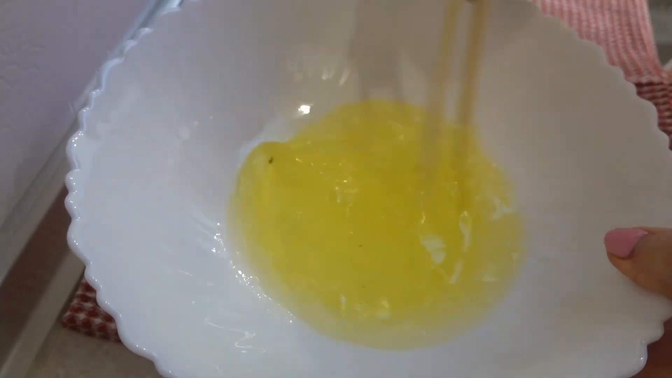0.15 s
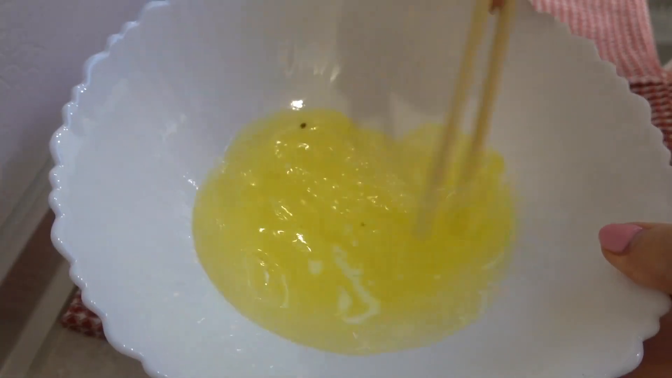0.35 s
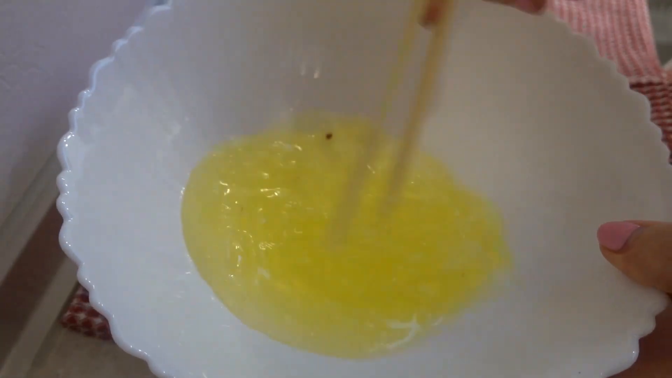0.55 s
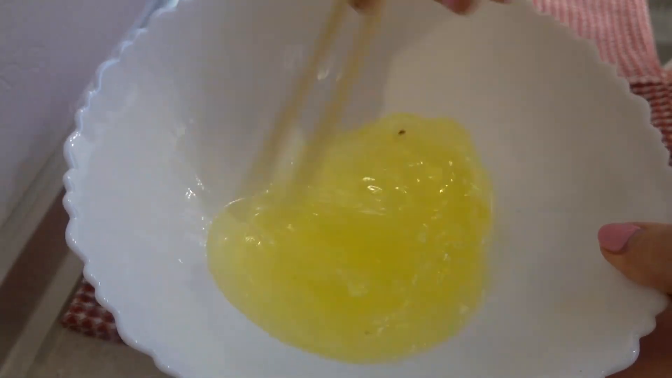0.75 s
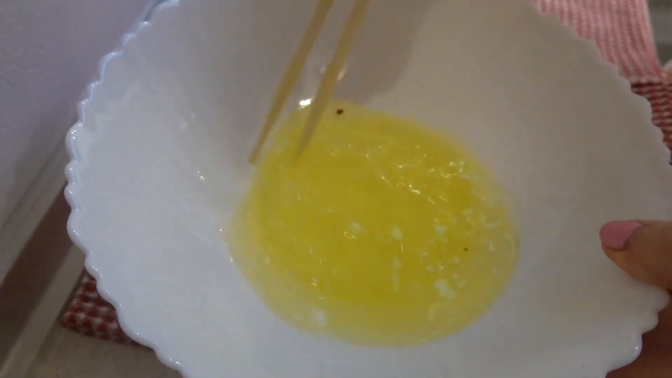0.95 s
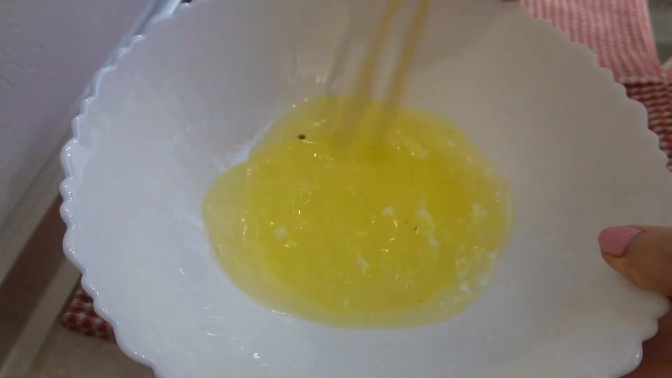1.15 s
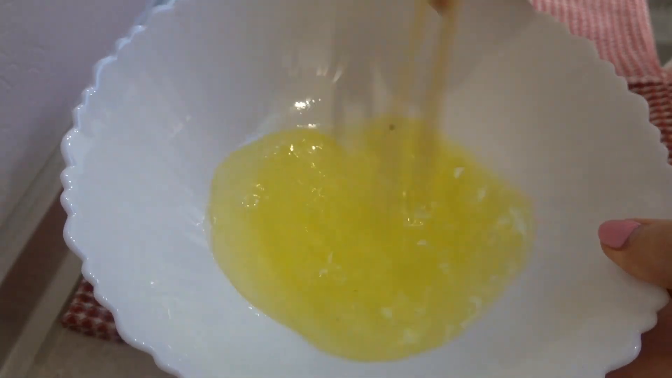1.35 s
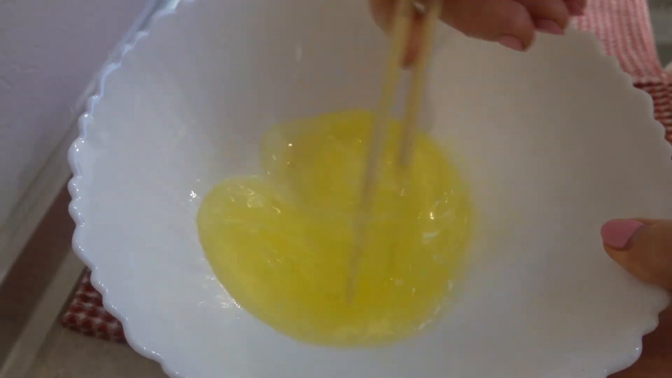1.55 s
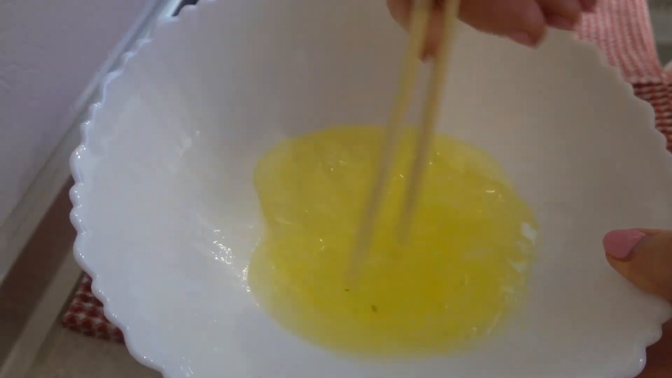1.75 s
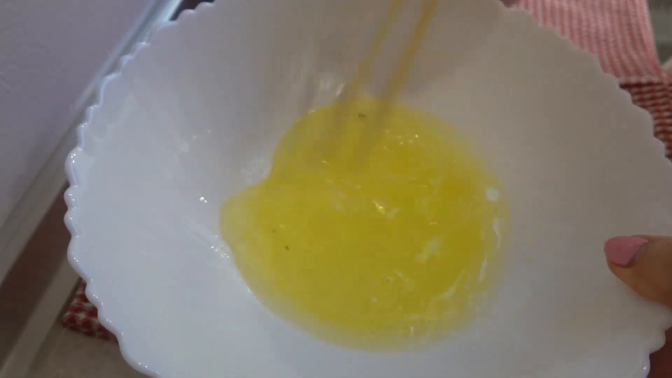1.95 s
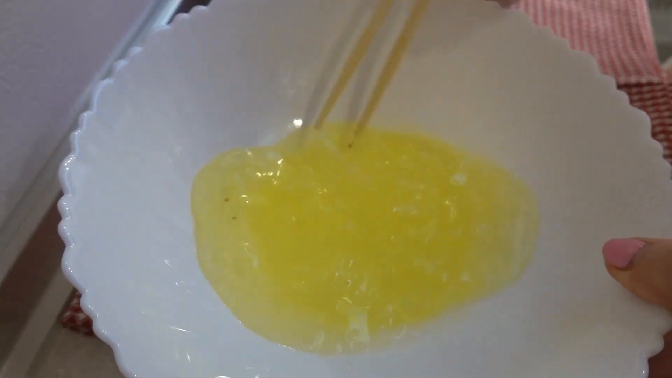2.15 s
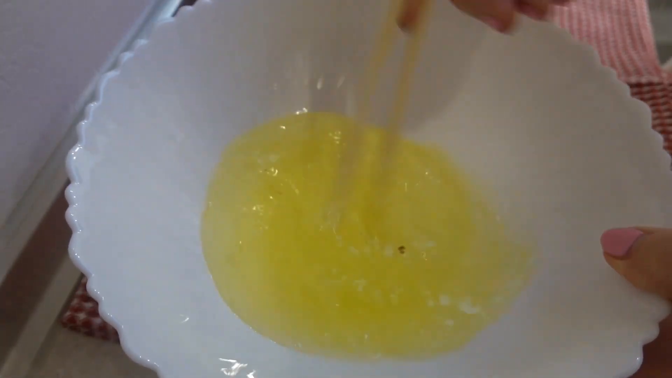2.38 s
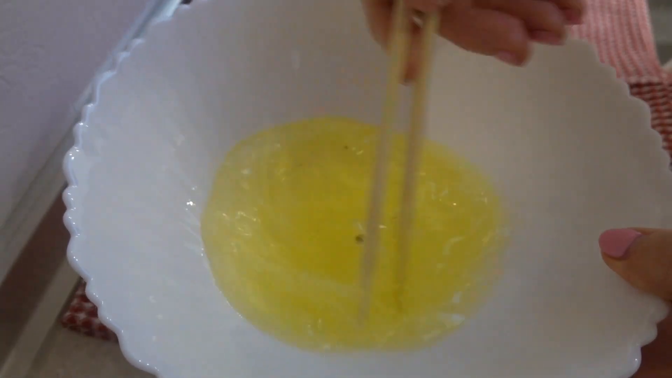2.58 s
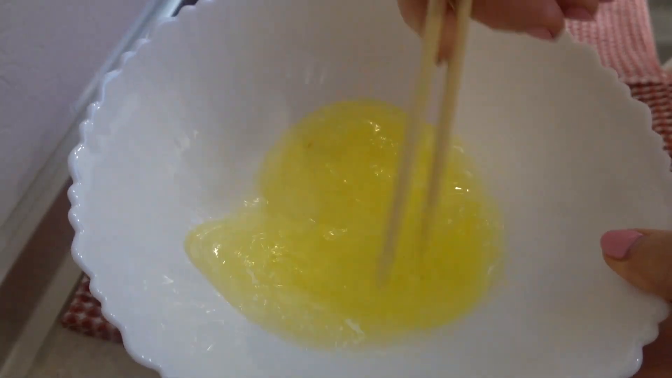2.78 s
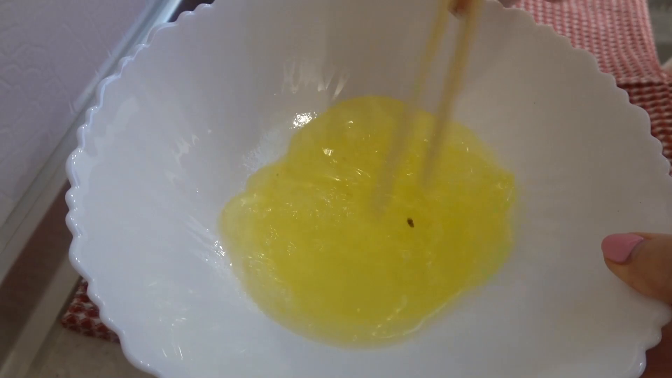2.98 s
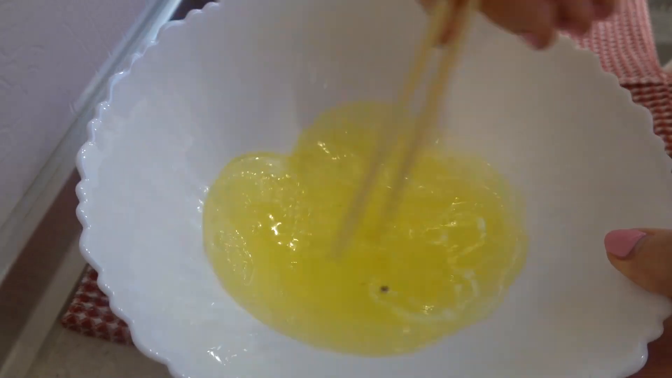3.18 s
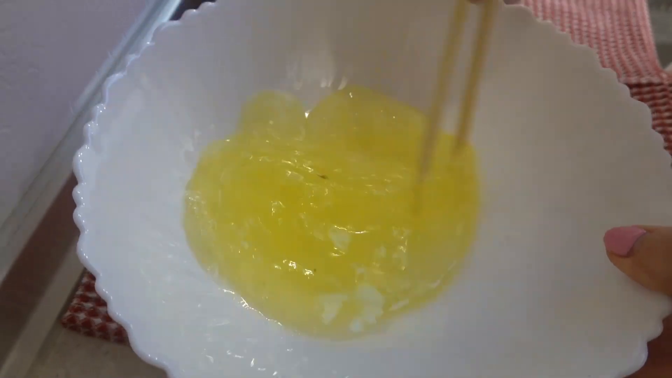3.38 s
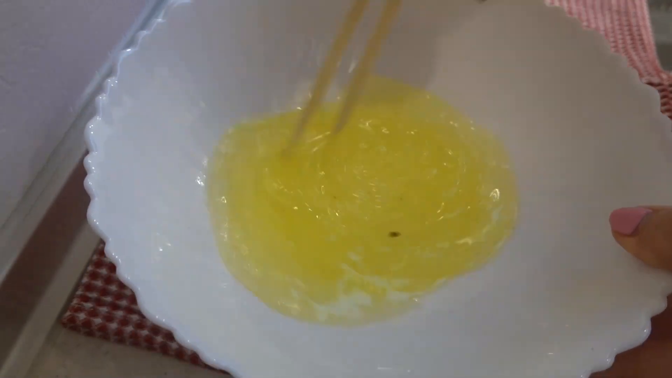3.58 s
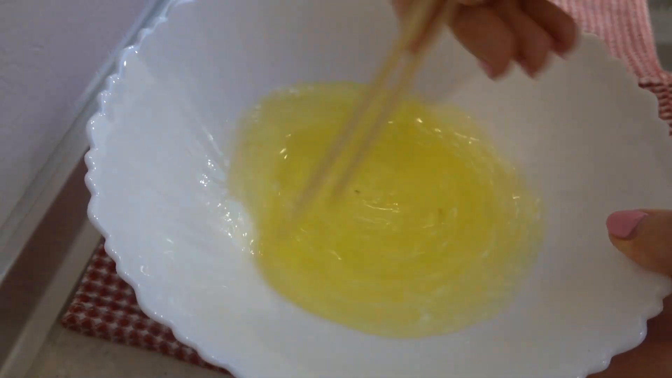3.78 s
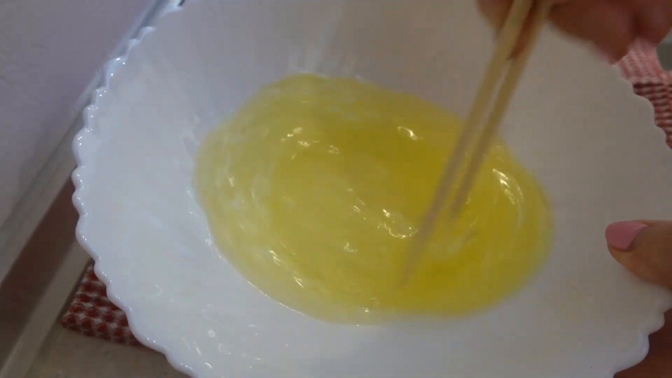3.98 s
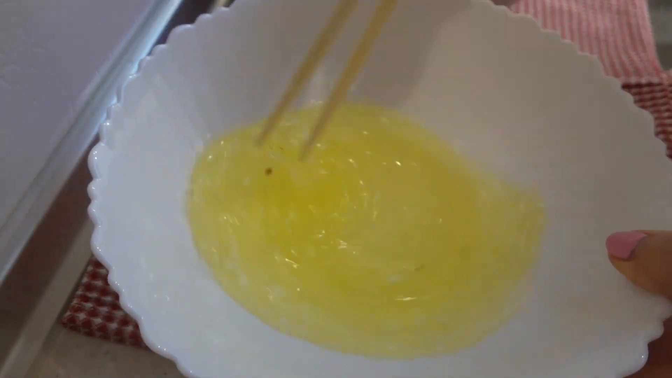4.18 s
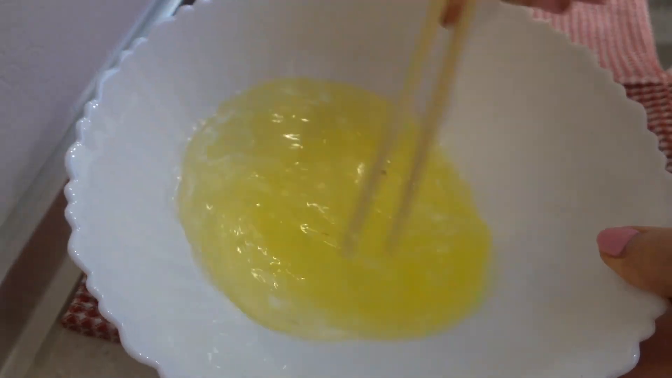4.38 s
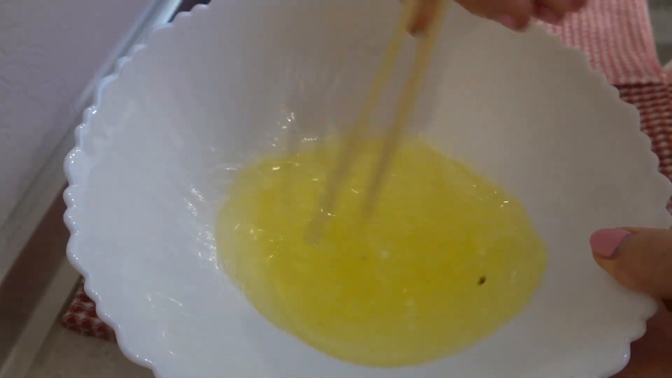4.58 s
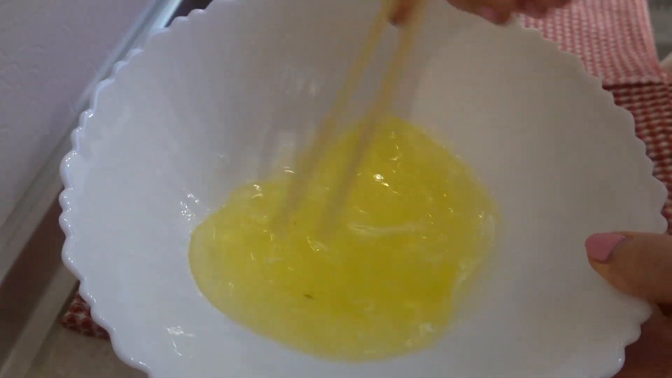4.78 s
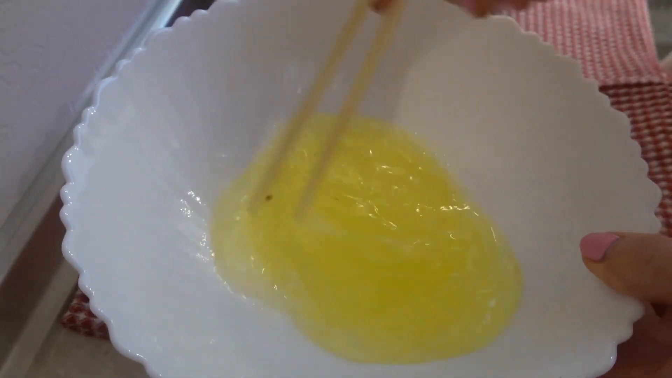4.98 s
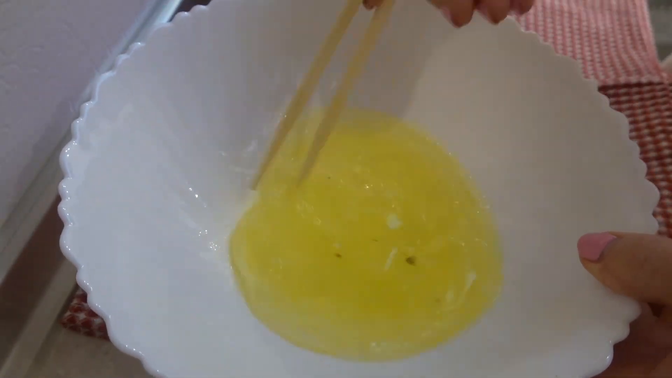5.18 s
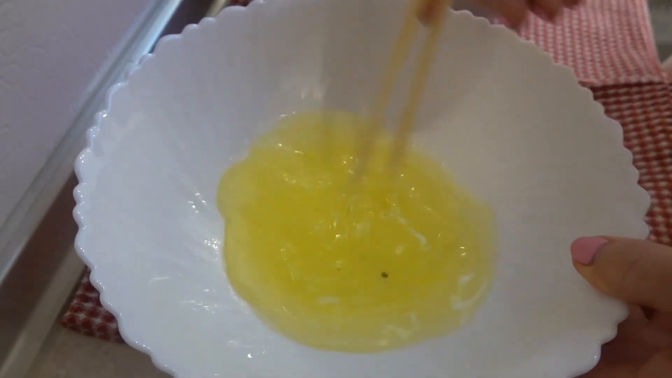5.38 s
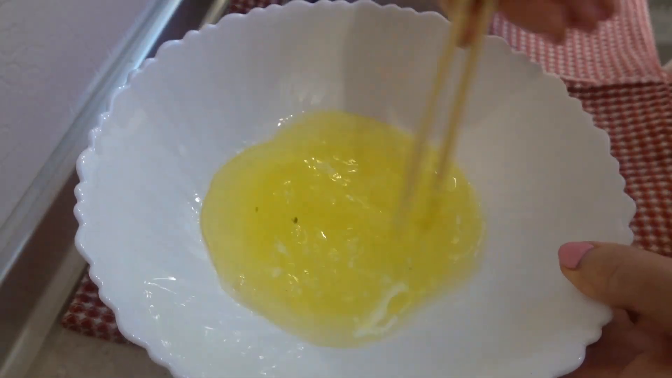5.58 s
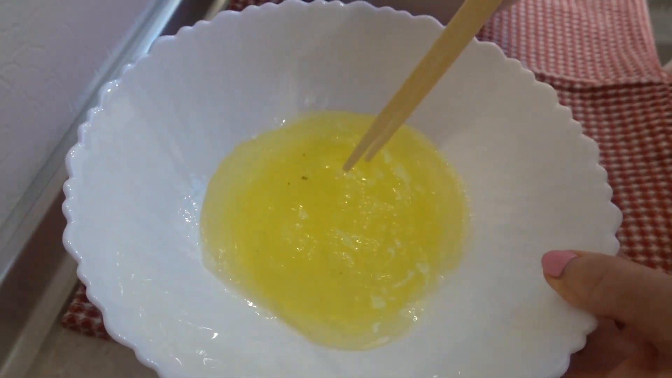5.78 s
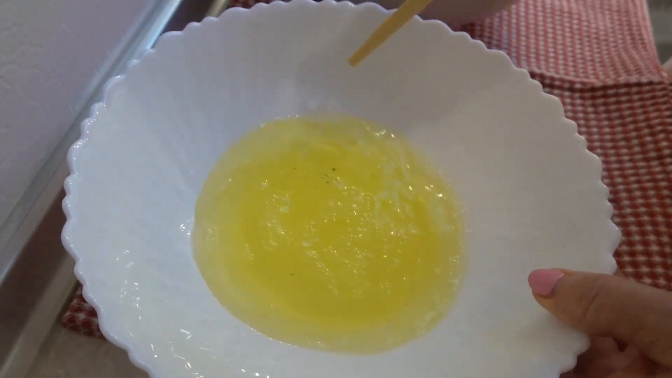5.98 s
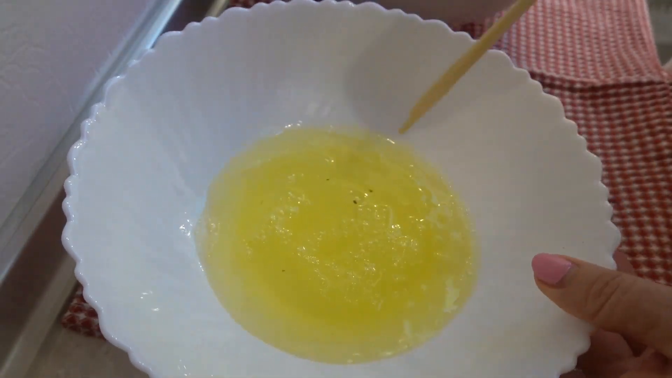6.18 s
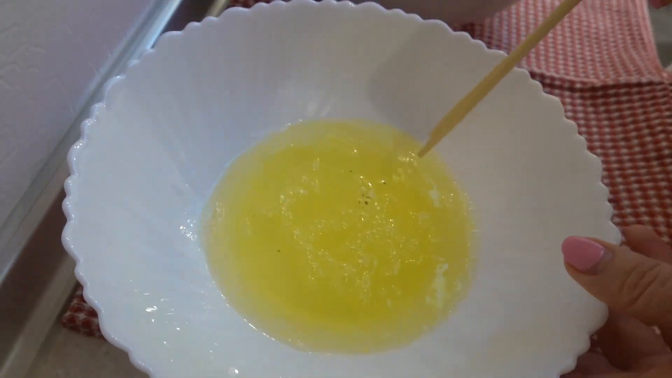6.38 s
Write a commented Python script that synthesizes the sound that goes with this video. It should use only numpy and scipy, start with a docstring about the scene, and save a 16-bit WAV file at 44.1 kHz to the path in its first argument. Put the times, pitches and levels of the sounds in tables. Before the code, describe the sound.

Close, splashy egg beating with hollow plops and fine spatter runs fast, pauses, resumes, and ends with a small ceramic clink in a kitchen.

```python
"""Chopsticks beat raw egg in a ceramic bowl close to a phone in a small kitchen: a fast run, a lull, a second run.
Each slap of the egg is a burst of wet noise and fine spray with a ringing air pocket; low plops are bending tones.
Noise bursts are thrown egg that spatters, flickering noise is egg that slides, and tiny tones are froth.
The air hollow and the ceramic colour the slaps, short low tones thump, and a short noise tail is the room.
At the end a stick taps the rim and the ceramic rings, over room rumble, hiss and a faint hum."""
import sys
import numpy as np
from scipy import signal
from scipy.fft import rfft, irfft
from scipy.io import wavfile
from scipy.ndimage import uniform_filter1d

SR = 44100
rng = np.random.default_rng(int(sys.argv[2]) if len(sys.argv) > 2 else 0)


def field_ratio(decibels):
    """Amplitude ratio for a level in dB (20 dB per decade); scalars and array-likes work."""
    return 10 ** (np.asarray(decibels, dtype=float) / 20)


def output_pcm(signal):
    """Save a mono or channel-first signal as 16-bit PCM at the path in sys.argv[1].

    Samples are clipped to [-1, 1] before scaling.
    """
    pcm = np.clip(np.atleast_2d(signal).T, -1, 1) * 32767
    wavfile.write(sys.argv[1], SR, np.round(pcm).astype(np.int16))


N = 284445  # length in samples

# Table levels are in dB; slaps, ceramic, hollow and background add a level of their own.
# slaps of the egg, stick strikes and the splashes that follow them:
# (t/s, level/dB, pocket f/Hz, spray level/dB)
EGG_SLAPS = [(0.0138, -27.5, 2660, -37), (0.131, -13, 2460, -19), (0.1719, -11.5, 2810, -24.5),
             (0.1853, -16, 2900, -18.5), (0.1911, -9.5, 2370, -47), (0.2034, -15, 2440, -21.5),
             (0.2945, -12.5, 4980, -17), (0.3659, -13.5, 5020, -28.5), (0.4697, -13, 2516, -15.5),
             (0.5493, -10.5, 1490, -30), (0.5809, -15.5, 2330, -31.5), (0.6193, -22.5, 3030, -21),
             (0.648, -10.5, 2940, -18), (0.6857, -20, 2990, -35), (0.7774, -20.5, 3510, -42),
             (0.7891, -13.5, 7130, -26.5), (0.8154, -11.5, 2390, -21.5), (0.9046, -18.5, 2370, -48.5),
             (0.9801, -11, 2663, -17), (1.046, -14.5, 1330, -24), (1.1574, -14.5, 2000, -15.5),
             (1.2178, -16.5, 1310, -25), (1.3314, -25, 2600, -19.5), (1.3528, -16, 3690, -31.5),
             (1.4045, -21.5, 1620, -35), (1.4982, -13, 2760, -21.5), (1.514, -13, 2330, -31.5),
             (1.5604, -21, 1630, -46), (1.6136, -17, 1900, -39), (1.6477, -12.5, 1836, -18.5),
             (1.69, -15.5, 2740, -17), (1.736, -8, 2796, -20), (1.8481, -13, 4210, -19),
             (1.8881, -6.5, 1417, -48.5), (2.0157, -19, 2960, -28.5), (2.027, -14.5, 4570, -18),
             (2.0503, -17.5, 2570, -33.5), (2.0974, -23, 1510, -21), (2.197, -11.5, 1617, -16.5),
             (2.369, -14, 2550, -20), (2.3987, -22.5, 1370, -23), (2.4535, -14, 2780, -29.5),
             (2.5454, -9.5, 1650, -20), (2.61, -13, 2645, -33), (2.7199, -9, 2240, -19.5),
             (2.774, -8.5, 2890, -23.5), (2.8923, -11, 1390, -21.5), (2.953, -9.5, 2030, -23),
             (2.9797, -11, 1360, -23), (3.064, -10.5, 2355, -21), (3.133, -25, 4460, -23),
             (3.2706, -11.5, 1774, -30), (3.3272, -23, 2650, -36), (3.4785, -28.5, 2760, -48),
             (3.496, -23, 2520, -59), (3.641, -26, 1440, -49), (4.1449, -29, 2880, -53.5),
             (4.1468, -22, 1450, -60), (4.3064, -13, 1450, -20.5), (4.344, -18, 2430, -41),
             (4.4519, -20, 2940, -53), (4.478, -12, 3550, -20.5), (4.588, -24, 1380, -46.5),
             (4.6684, -12.5, 2760, -19.5), (4.7572, -15, 2670, -37), (4.8122, -24.5, 1490, -37),
             (4.856, -13.5, 2620, -18.5), (4.9139, -8, 3530, -19), (5.0078, -10, 3080, -22.5),
             (5.0445, -9, 2760, -15.5), (5.0755, -12, 2680, -40), (5.0996, -13.5, 3480, -21.5),
             (5.1134, -20, 2760, -21), (5.2165, -10, 2410, -20), (5.249, -19, 2690, -29.5),
             (5.2963, -13, 1680, -22.5), (5.406, -12.5, 4720, -20), (5.4388, -12.5, 3500, -20.5),
             (5.5746, -10.5, 2410, -17)]
# low plops, air pockets and, near 960 Hz, the bowl's air hollow sounding:
# (t/s, level/dB, starting f/Hz, f/Hz that the bend passes as the plop dies)
LOW_PLOPS = [(0.01, -25.5, 930, 984), (0.419, -40, 1063, 1090), (.554, -22.5, 857, 940),
             (0.6207, -19.5, 967, 990), (1.043, -15, 586, 898), (1.176, -15.5, 954, 904),
             (1.218, -14, 817, 798), (1.235, -21.5, 1120, 1170), (1.4265, -21, 948, 969),
             (1.6508, -14, 947, 927), (1.7, -17, 990, 1094), (1.835, -25.5, 940, 847),
             (1.889, -20.5, 966, 990), (1.9384, -13, 980, 970), (2.395, -18, 955, 964),
             (2.437, -26.5, 966, 878), (2.61, -17, 835, 841), (2.7722, -15, 932, 985),
             (2.893, -12.5, 969, 988), (2.9797, -17, 947, 1012), (4.36, -32.5, 962, 983),
             (4.915, -26.5, 990, 962), (5.0137, -23, 947, 980), (5.067, -21.5, 1018, 973),
             (5.0996, -21.5, 847, 846), (5.298, -13.5, 1066, 1176)]
# egg sliding round the wall: (t/s, level/dB)
SLIDE_LEVEL = [(0, -52), (1.8, -50.5), (2.15, -57.5), (3.2, -60.5), (3.8, -53.5), (4.1, -56.5),
               (4.25, -65.5), (5.2, -59), (5.921, -57.5), (6.1, -71.5), (6.45, -66.5)]
# resonances of the air hollow of the bowl: (f/Hz, t60/s, level/dB)
HOLLOW_MODES = [(943, 0.03, 15), (1650, 0.073, 1.5), (2444, 0.069, -0.5),]
# ringing modes of the ceramic: (f/Hz, level/dB, t60/s when free of liquid)
CERAMIC_MODES = [(807, -3, 2.5), (1389, -10, 1.0), (2073, 0, 1.0), (2869, -8, .51), (3768, -9, .38),
                 (4770, -13, .2)]
# low thumps and rumbles of the bowl, short low tones: (t/s, level/dB, f/Hz, t60/s)
LOW_THUMPS = [(1.043, -21, 372, 0.045), (3.63, -41, 72.5, 0.42), (5.596, -29, 97.5, 0.19),
              (6.305, -25.5, 97, 0.11)]
# spectrum of the kitchen rumble and hiss: (f/Hz, level/dB)
BACKGROUND_SPECTRUM = [(15, -45), (25, -9.5), (53, -3.5), (175, -10), (242, -11.5), (503, -21),
                       (16000, -44)]
# spatters of thrown egg landing on the wall: (t/s, level/dB)
SPATTERS = [(0.258, -24.5), (0.3127, -21.5), (.416, -30.5), (0.5346, -30), (.5564, -30), (0.8752, -33),
            (1.1143, -36.5), (1.2905, -38), (1.5793, -29), (1.7462, -21.5), (1.9565, -33.5),
            (2.3214, -30.5), (2.4048, -25.5), (2.6263, -27), (2.668, -38), (2.799, -26), (2.9395, -26.5),
            (3.712, -46), (4.429, -30.5), (4.7142, -22.5), (4.761, -24.5), (5.279, -28), (5.3507, -28)]

POCKET_GLIDE = .08  # upward bend of small air pockets


def fade(t, t60):
    """Exponential decay, 60 dB down after t60 seconds."""
    return np.exp(-np.log(1000) * t / t60)


def band(x, lo_hz, hi_hz, order=2):
    """Band-pass along time."""
    sos = signal.butter(order, [lo_hz, min(hi_hz, .45 * SR)], "band", fs=SR, output="sos")
    return signal.sosfilt(sos, x)


def unit(x):
    """Scale to rms 1."""
    return x / np.sqrt(np.mean(x ** 2))


def ring(x, hz, t60):
    """One resonance set ringing by x: a decaying sine follows every sample."""
    pole = np.exp(2j * np.pi * hz / SR - np.log(1000) / (t60 * SR))
    return signal.lfilter([1], [1, -pole], x).imag


def add(out, s, sound):
    """Mix a short sound in at time s."""
    i = max(int(s * SR), 0)
    out[..., i:i + sound.shape[-1]] += sound[..., :N - i]


def pair(mid, side):
    """Left and right from mid and side."""
    return np.array([mid + side, mid - side])


def walk(rate):
    """Random levels, a new one every 1 / rate seconds, joined by ramps."""
    k = int(SR / rate)
    return uniform_filter1d(np.repeat(rng.standard_normal(N // k + 1), k), k)[:N]


def smooth_noise(length, size):
    """Noise averaged over size samples, rescaled to a spread near 1."""
    return uniform_filter1d(rng.standard_normal(length), size=size) * np.sqrt(size)


def bubble(t, hz, t60, glide, rise_s):
    """A decaying tone, like a ringing air pocket; glide bends it upward, as when a pocket nears the surface."""
    t60 = max(t60, .01)
    tone = np.sin(2 * np.pi * hz * (t + glide * t ** 3 / t60 ** 2))
    return tone * (1 - np.exp(-t / rise_s)) * fade(t, t60)


def quiet():
    """Shaped noise as rumble shared by both ports and hiss apart, with a wavering appliance hum."""
    level_db, hum_hz, hum_db = -55.5, 142.6, -61.5
    f = np.maximum(np.fft.rfftfreq(N, 1 / SR), 1)
    hz, db = np.transpose(BACKGROUND_SPECTRUM)
    gain = field_ratio(np.interp(np.log(f), np.log(hz), db))
    mid, side = irfft(rfft(rng.standard_normal((2, N))) * gain, N)
    side = .13 * side + 1.4 * band(side, 1500, 19000, order=1)
    # a narrow band of noise wavers like an unsteady tone
    hum = unit(band(rng.standard_normal(N), hum_hz - 5, hum_hz + 5, order=1)) * field_ratio(hum_db)
    return pair(mid, side) / np.std(mid) * field_ratio(level_db) + hum


def swish():
    """Thick liquid sliding on glaze: noise that flickers band by band."""
    spatter_db, busy_gurgle_db, calm_gurgle_db = 5, 8, 3
    slap_marks = np.zeros(N)
    slap_marks[(np.array(EGG_SLAPS)[:, 0] * SR).astype(int)] = 1
    # the egg gurgles where slaps come thick and settles where they are sparse
    beating = np.clip(uniform_filter1d(slap_marks, size=SR // 4) * SR / 10 - .5, 0, 1)
    gurgle_db = calm_gurgle_db + (busy_gurgle_db - calm_gurgle_db) * beating
    flicker_db = spatter_db * beating * walk(90)  # shared by all bands
    slide = 0
    for hz in 700 * 2 ** np.arange(0, 4.4, .25):
        # strongest near 1.8 kHz; every narrow band gurgles on its own, the treble less
        tilt_db = -9 - 1.5 * abs(np.log2(hz / 1800))
        share_db = tilt_db + gurgle_db * min(3500 / hz, 1) * walk(45) + flicker_db
        noise = band(rng.standard_normal((2, N)), hz / 1.034, hz * 1.046, order=1)
        slide += field_ratio(share_db) * unit(noise)
    s, db = np.transpose(SLIDE_LEVEL)
    return field_ratio(np.interp(np.arange(N) / SR, s, db)) * pair(slide[0], 0.62 * slide[1])


def droplets(out, s, db, wobble):
    """Trailing drops: small trembling air pockets of chance time, pitch and level, later ones weaker."""
    t = np.arange(1300) / SR
    for late, pitch, weak in rng.random((14, 3)):
        blob = bubble(t, 900 * 5.5 ** pitch, 0.026, POCKET_GLIDE, 0.0059) * wobble[-1300:]
        add(out, s + .09 * late, field_ratio(db - 4 - 10 * weak - 11 * late) * blob)


def bowl_colour(x):
    """The air hollow rings with the splashes; the egg also shakes the ceramic, damped by the liquid."""
    x = x + sum(field_ratio(db - 43.0) * ring(x, hz, t60) for hz, t60, db in HOLLOW_MODES)
    return x + sum(field_ratio(db - 47.0) * ring(x, hz, .045) for hz, db, _ in CERAMIC_MODES)


def slaps():
    """A crack, a wet body of noise, a fine spray, a ragged small pocket and trailing droplets for each slap."""
    body_db, pocket_db, spray_trim_db = -10.5, -5, 1.5
    rest_gap_s, lead_s = .11, 1 / 80
    body, spray, pockets = np.zeros((2, N)), np.zeros((2, N)), np.zeros(N)
    t = np.arange(SR // 8) / SR
    gaps = np.diff(np.array(EGG_SLAPS)[:, 0], append=N / SR)
    for (s, db, hz, spray_db), gap in zip(EGG_SLAPS, gaps):
        wet, fine = rng.standard_normal((2, 2, len(t)))
        # the liquid lands in clumps, and a pocket's walls tremble
        clump, wobble = smooth_noise(len(t), 64), smooth_noise(len(t), 64)
        surge = smooth_noise(len(t), 400)
        if gap < rest_gap_s:
            # 1 is a full slap; only the softest slaps fall below it
            hard = np.clip(2 + (max(db, spray_db + 8.5) + 6) / 22, .05, 1)
            dry_db = 0
            t60 = np.clip(0.5 * gap, 0.047, .1)  # splashes are shorter when the next slap is near
        else:
            # before a longer gap the slap is a dry pat with weaker drops
            hard, dry_db, t60 = 1, -8, 0.05
        crack = 1.63 * hard * fade(t, 0.0051)
        splash = (1 - np.exp(-t * hard / 0.0019)) * fade(t, t60) * field_ratio(3.72 * clump)
        run_off = 0.042 * field_ratio(dry_db) * fade(t, 0.085) * field_ratio(10.6 * surge)
        shape = crack + splash + run_off

        # each splash is coloured around the pitch of its pocket, soft ones more narrowly
        top_hz = max(3500 * field_ratio(3 * max(spray_db - db + 13.0, 0)), hz)  # strong spray opens the top
        low_hz = hz / 1.25  # the splash thins below this
        burst = shape * wet
        broad = 0.82 * band(burst, 790, top_hz, order=1) + band(burst, low_hz, top_hz)
        # one narrow noise band of chance pitch, within an octave either way, colours it too
        stray_hz = min(hz * 4 ** rng.random() / 2, top_hz)
        broad = broad + 3.15 * band(burst, stray_hz / 1.05, stray_hz * 1.05, order=1)
        narrow = 3.38 * band(burst, hz / 1.093, hz * 1.114, order=1)
        body_gain = field_ratio(db + body_db)
        add(body, s, body_gain * ((0.34 + 0.66 * hard) * broad + narrow))

        mist_hz = 6000 * 2 ** rng.random()  # every spray has its own brightest region
        mist = fine + band(fine, mist_hz, mist_hz * 1.4, order=1)
        spray_gain = field_ratio(spray_db + spray_trim_db)
        add(spray, s, spray_gain * shape * fade(t, .18) * mist)

        # soft slaps swell in before they land
        lead = .5 * (1 - hard) * np.exp(-t[SR // 80::-1] / .005)
        add(body, s - lead_s, body_gain * band(lead * wet[:, -len(lead):], low_hz, top_hz))
        add(spray, s - lead_s, spray_gain * lead * fine[:, -len(lead):])

        pocket = bubble(t, hz, .03, POCKET_GLIDE, 0.00048) * (1 + 0.36 * wobble)
        add(pockets, s, field_ratio(db + pocket_db) * pocket)
        droplets(pockets, s, db + dry_db, wobble)
    body = band(body, 640, 5600, order=4)
    body[0] = bowl_colour(body[0])
    spray = band(spray, 4600, 9700, order=1)
    # the two ports differ more toward the treble
    side = 0.56 * band(body[1], 2400, 10000, order=1) + 0.85 * spray[1] + 0.053 * pockets
    return pair(body[0] + pockets + spray[0], side)


def kitchen(x):
    """Hard walls return a short diffuse tail, made by convolving with fading noise."""
    level_db, t60_s = -12.5, 0.3
    t = np.arange(SR // 2) / SR
    noise = rng.standard_normal((2, len(t))) * (1 - np.exp(-t / 0.0022))
    tail = band(noise, 740, 11000, order=1) * fade(t, t60_s)
    tail = pair(tail[0], 1.08 * band(tail[1], 1200, 18000, order=1))
    tail = tail / np.linalg.norm(tail[0])
    return signal.fftconvolve(x.mean(axis=0, keepdims=True), tail, axes=1)[:, :N] * field_ratio(level_db)


def plops():
    """Low plops of air pockets and of the bowl's air hollow: tones that hold, bend in pitch and choke off."""
    out, t = np.zeros(N), np.arange(SR // 10) / SR
    for s, db, first_hz, last_hz in LOW_PLOPS:
        wobble = smooth_noise(len(t), 80)
        # a plop that bends further lasts longer
        length = 0.016 + 0.02 * abs(np.log2(last_hz / first_hz))  # s
        bend = np.minimum(t / length, 1.2) ** 2  # goes on a little past the second pitch
        hz = first_hz + (last_hz - first_hz) * bend + 27 * wobble
        shape = (1 - np.exp(-t / 0.00068)) * np.exp(-(t / length) ** 1.45)
        tone = np.sin(2 * np.pi * np.cumsum(hz) / SR)
        add(out, s, field_ratio(db + 1.72 * wobble) * shape * tone)
    return pair(out, -.1 * out)


def froth():
    """Scattered small bubbles of chance pitch and level burst, stronger where the egg slides louder."""
    out, t = np.zeros(N), np.arange(SR // 20) / SR
    when, slide_db = np.transpose(SLIDE_LEVEL)
    for at, pitch, weak in rng.random((400, 3)):
        s = at * N / SR
        db = np.interp(s, when, slide_db) + 16 - 20 * weak
        add(out, s, field_ratio(db) * bubble(t, 800 * 4.5 ** pitch, .04, POCKET_GLIDE, .002))
    return pair(out, .2 * out)


def spats():
    """Soft bright noise bursts that swell and die in milliseconds, each with its own length and colour."""
    out, t = np.zeros((2, N)), np.arange(SR // 20) / SR
    for s, db in SPATTERS:
        slow, thin = rng.random(2)
        u = t / (.0025 * (.5 + slow))  # time over the rise time
        swell = u * np.exp(1 - u) * field_ratio(2.5 * smooth_noise(len(t), 64))
        noise = rng.standard_normal((2, len(t)))
        burst = band(swell * noise, 2410 * 2 ** thin, SR / 2, order=1)
        add(out, s, field_ratio(db) * pair(burst[0], 0.77 * burst[1]))
    return out


def thumps():
    """Low thumps and rumbles of the bowl: short low tones of steady pitch that die away."""
    out, t = np.zeros((2, N)), np.arange(SR // 4) / SR
    for s, db, hz, t60 in LOW_THUMPS:
        add(out, s, field_ratio(db) * bubble(t, hz, t60, 0, 0.012))
    return out


def tap():
    """A stick on the rim: a noise tick, a short knock and the free ring of the ceramic."""
    tap_s, tap_db, ring_db = 6.2995, -29, -44
    out, t = np.zeros((2, N)), np.arange(SR // 4) / SR
    noise = rng.standard_normal((2, len(t))) * fade(t, 0.043)
    tick = band(noise, 950, 15000, order=1) * field_ratio(tap_db)
    knock = field_ratio(tap_db) * bubble(t, 940, 0.023, 0, 0.00041)
    tones = sum(field_ratio(db + ring_db) * np.sin(2 * np.pi * hz * t) * fade(t, t60)
                for hz, db, t60 in CERAMIC_MODES)
    add(out, tap_s, pair(tick[0] + knock + tones, 0.68 * tick[1] + 0.14 * tones))
    return out


def scene():
    """Bowl, room and background."""
    bowl = slaps() + plops() + froth() + spats() + thumps() + tap()
    return bowl + kitchen(bowl) + swish() + quiet()


def band_limit(x):
    """A steep low-pass at the top of the band."""
    return signal.sosfilt(signal.butter(12, 16960, fs=SR, output="sos"), x)


def record(dry):
    """The phone rounds the loudest peaks and rolls off the top."""
    rounded = np.tanh(dry)
    top_cut = signal.cheby1(6, .5, 15700, fs=SR, output="sos")  # ripple in dB, edge in Hz
    mix = signal.sosfilt(top_cut, rounded)
    return band_limit(mix)


dry = scene()
out = record(dry)
output_pcm(out)
```